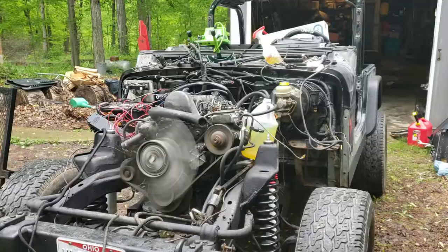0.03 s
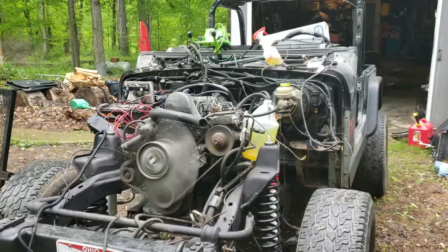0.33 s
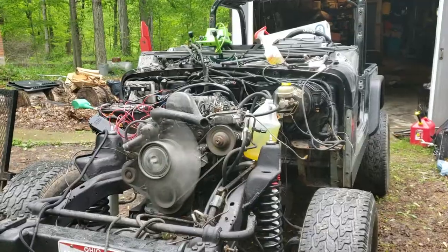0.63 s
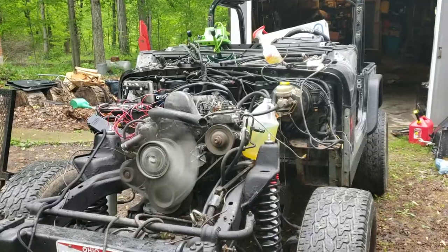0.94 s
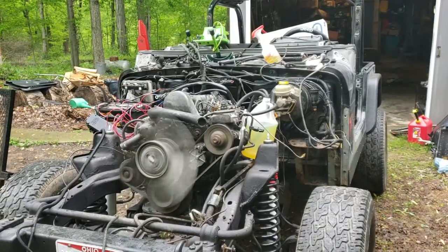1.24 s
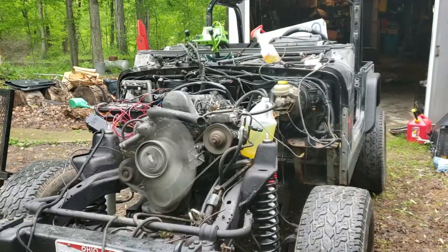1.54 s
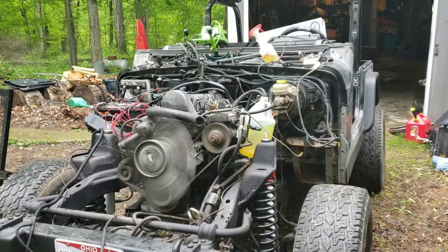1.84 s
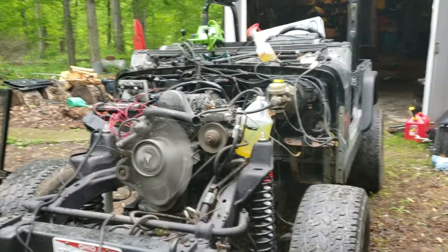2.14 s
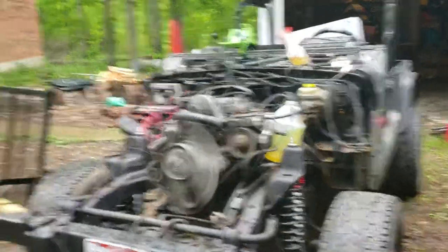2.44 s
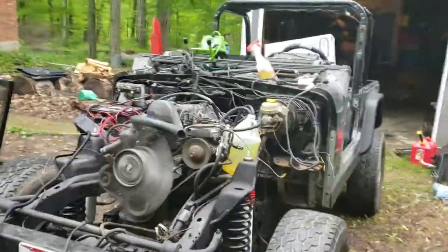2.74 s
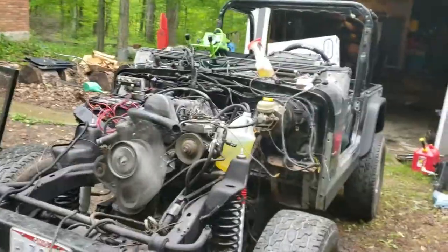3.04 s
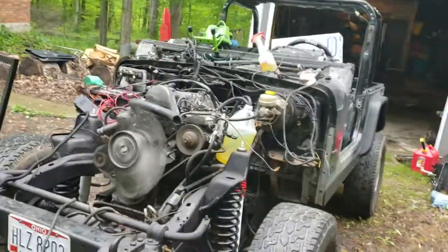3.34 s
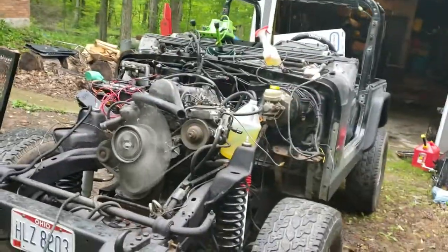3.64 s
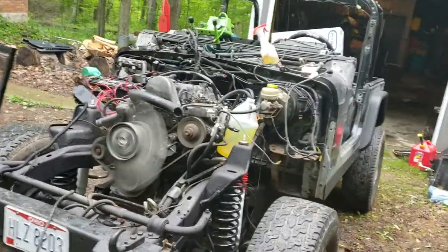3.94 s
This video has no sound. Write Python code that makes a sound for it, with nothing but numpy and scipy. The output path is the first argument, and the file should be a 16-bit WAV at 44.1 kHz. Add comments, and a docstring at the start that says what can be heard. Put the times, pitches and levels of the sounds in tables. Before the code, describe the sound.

An off-road car's diesel engine clatters at idle, with low pulses and metallic clacks.

```python
"""A five-cylinder diesel clatters at idle outdoors, in the bare front of an off-road car.
Over the whirr of fan and belts, each firing gives a spray of injector ticks, a knock that rings the
block's modes and a low boom of gas in the pipe; abrupt ignitions add a metallic clack.
Near 2.5 s a rasp swells and a finger clicks twice on the microphone, which moves back and aside,
so that the engine changes colour and is softer for about a second."""
import sys
import numpy as np
from scipy import signal
from scipy.fft import rfft, irfft
from scipy.io import wavfile
from scipy.ndimage import uniform_filter1d

SR = 44100
rng = np.random.default_rng(int(sys.argv[2]) if len(sys.argv) > 2 else 0)


def generate_wav(sig):
    """Save sig (samples, or channels by samples) to the path in sys.argv[1] as 16-bit PCM at SR."""
    pcm = np.round(np.clip(np.atleast_2d(sig).T, -1, 1) * 32767).astype(np.int16)
    wavfile.write(sys.argv[1], SR, pcm)


N = 176400
T = np.arange(N) / SR

# The cylinders in firing order, with relative levels:
# boom_delay_s, boom_start_hz, boom_rise_hz, boom_db, boom_swell_s, knock_db, tick_db
CYLINDERS = [(.0001, 167, 46.6, -12, 0.0063, 0.5, 3), (-.0016, 104.8, 103.1, -16, 0.0098, -2, 0),
             (.0003, 125.6, 51.8, -14.5, 0.0088, 0.5, 1), (.0003, 149.4, 73.2, -12.5, 0.007, 0.5, 1),
             (.0006, 128.5, 64.8, -12.5, 0.0067, 2.5, 2)]
# Gain of each source as the microphone moves: time_s, boom_db, knock_db, tick_db, whirr_db
PATH_GAINS = [(.1, -1.5, -2, -2.5, 0), (.5, 0.5, -2, 0.5, 1.5), (1, 0.5, 0, -0.5, 2),
              (1.9, 0.5, -0.5, -0.5, 2), (2.3, .5, -1, 4, 3), (2.5, -.5, 3, 2.5, 2),
              (2.8, -5.5, -7, -3.5, -2.5), (3.2, -6.5, -7.5, -5.5, -4), (3.55, -6.5, -8.5, -5.5, -4),
              (3.8, -4, -5, -1, -1.5), (4, -1, -1.5, 0, 0.5)]
# Spectral envelope of the ticks and the rasp: frequency_hz, gain_db
TICK_SPECTRUM = [(800, -13.5), (2500, -18), (4200, -1.5), (5300, -3), (6200, -2), (7000, 2), (8000, -6.5),
                 (9500, 2.5), (11500, 2.5), (13000, 0.5), (14200, -1.5), (16000, -3)]


def amp(db):
    """Decibels as an amplitude ratio."""
    return 10 ** (np.asarray(db) / 20)


def unit(x):
    """Normalisation to an rms of one."""
    return x / np.sqrt(np.mean(x ** 2) + 1e-20)


def over_time(table, column):
    """Linear interpolation of a time table at every sample."""
    rows = np.array(table)
    return np.interp(T, rows[:, 0], rows[:, column])


def over_frequency(table, hz, column=1):
    """Interpolation of a table on a logarithmic frequency axis."""
    rows = np.array(table)
    return np.interp(np.log(hz + 1), np.log(rows[:, 0]), rows[:, column])


def add(mix, start_s, sound):
    """Superposition of a sound on the mix."""
    part = mix[..., max(round(start_s * SR), 0):][..., :sound.shape[-1]]
    part += sound[..., :part.shape[-1]]


def colour(x, table, column=1, size=4096):
    """Minimum-phase filtering by a spectral envelope."""
    hz = abs(np.fft.fftfreq(size, 1 / SR))
    log_gain = np.log(amp(over_frequency(table, hz, column)))
    response = np.exp(np.conj(signal.hilbert(log_gain)))
    taps = np.fft.ifft(response).real[:size // 2]
    return signal.oaconvolve(np.atleast_2d(x), taps[None], axes=1)[:, :N]


def spread(pair):
    """Interaural coherence: two signals become a stereo pair of unit rms, alike in the bass."""
    # Likeness of the channels: frequency_hz, coherence (capped at one below)
    likeness = [(30, 1), (80, 0.75), (150, 1.14), (350, 0.83), (700, 0.79), (1400, 0.7), (2500, .15),
                (5000, 0), (16000, 0)]
    # Level difference between the channels: frequency_hz, left_minus_right_db
    balance = [(60, -1), (92, -2.5), (140, 2.5), (210, 3), (330, -2), (500, 2.5), (770, 1), (1170, 2.5),
               (1790, 0), (2740, -4), (4190, -2.0), (6410, 0.5), (9810, -4.5), (15000, 4)]
    hz = np.fft.rfftfreq(N, 1 / SR)
    coherence = np.clip(over_frequency(likeness, hz), -1, 1)
    tilt = amp(over_frequency(balance, hz) / 2)
    mid, side = rfft(pair) * np.sqrt([1 + coherence, 1 - coherence])
    return unit(irfft(np.array([(mid + side) * tilt, (mid - side) / tilt]), N))


def drift(rate_hz, count=24):
    """Random modulation: a sum of sines of random phase in the decade below rate_hz."""
    rates_hz = np.geomspace(rate_hz / 10, rate_hz, count)
    return unit(sum(np.sin(2 * np.pi * (hz * T + rng.random())) for hz in rates_hz))


def crank(first_firing_s=.104):
    """Four-stroke cycle: a cylinder fires every second turn. Gives the running count and the times."""
    # Crankshaft speed: time_s, speed_rpm
    speed = [(0.0, 708.5), (0.35, 707.0), (0.7, 707.3), (1.1, 706.7), (1.6, 705.5), (2.1, 706.8),
             (2.6, 707.0), (3.2, 706.6), (4.0, 705.1)]
    firing_hz = over_time(speed, column=1) / 60 * len(CYLINDERS) / 2
    fired = np.cumsum(firing_hz) / SR
    fired -= np.interp(first_firing_s, T, fired)
    return fired, np.interp(np.arange(int(fired[-1]) + 1), fired, T)


def rattles(times, levels_db, attack_s, hold_s, decay_s, repeat, grain_db, scatter_db, jitter_s):
    """Dense impacts merge into noise bursts; the share `repeat` of their power recurs each cycle."""
    out, t = np.zeros((2, N)), T[:SR // 16]
    envelope = np.minimum(t / attack_s, 1) * np.exp(-np.maximum(t - hold_s, 0) / decay_s)
    patterns = rng.standard_normal((len(CYLINDERS), 2, len(t)))
    for k, (start_s, db) in enumerate(zip(times, levels_db)):
        strength, late = rng.standard_normal(2)
        grain = amp(grain_db * unit(uniform_filter1d(rng.standard_normal(len(t)), size=40)))
        fresh = rng.standard_normal((2, len(t)))
        burst = np.sqrt(repeat) * patterns[k % len(patterns)] + np.sqrt(1 - repeat) * fresh
        add(out, start_s + jitter_s * late, amp(db + scatter_db * strength) * envelope * grain * burst)
    return out


def fan_and_belts(air_db=-29, flutter_db=0.94, grain_db=1.33, waver=.003):
    """Fan turbulence and chain rustle give broadband noise; periodic belts and blades give tones."""
    # Belt and blade tones: pitch_hz, level_db
    partials = [(593.5, -47), (892, -51), (382.5, -51.5)]
    # Spectral envelope of the whirr: frequency_hz, gain_db
    air_spectrum = [(20, -5), (35, -6), (70, 3), (130, 4.5), (200, 5), (300, 5.5), (400, -2), (620, 4),
                    (850, -4), (1600, -3), (2300, -9), (4200, -6.5), (5500, -12), (7000, -9.5),
                    (8000, -16.5), (9800, -11), (12500, -8.5), (16000, -26.5)]
    grain = unit(uniform_filter1d(rng.standard_normal(N), size=50))
    noise = rng.standard_normal((2, N)) * amp(flutter_db * drift(rate_hz=120) + grain_db * grain)
    whirr = amp(air_db) * spread(colour(noise, air_spectrum))
    for hz, db in partials:
        wavering_hz = hz * (1 + waver * drift(rate_hz=8))
        whirr += amp(db) * np.sqrt(2) * np.sin(2 * np.pi * np.cumsum(wavering_hz) / SR)
    return whirr * amp(over_time(PATH_GAINS, column=4))


def injector_ticks(firings, lead_s=0.0069, gain_db=-32):
    """Brief impacts have wide spectra: injectors and valve gear give a bright spray before each boom."""
    tick_db = np.resize(np.array(CYLINDERS)[:, 6], len(firings))
    spray = rattles(firings - lead_s, tick_db, attack_s=0.00085, hold_s=0.0049, decay_s=0.0098,
                    repeat=0.29, grain_db=1.5, scatter_db=2.16, jitter_s=.0003)
    return amp(gain_db + over_time(PATH_GAINS, column=3)) * spread(colour(spray, TICK_SPECTRUM))


def block_ring(times, levels_db, cylinders, others_db, scatter_db, attack_s):
    """Modal excitation: a blow rings the block's damped modes, favouring those of its own cylinder."""
    # Modes of the block: pitch_hz, t60_s, level_db, cylinder (the one that strikes it hardest)
    modes = [(608, 0.056, -12, 4), (667, 0.035, -4, 2), (710, 0.025, -8, 0), (925, 0.033, -9.5, 3),
             (1065, .05, -5, 0), (1435, 0.05, -4, 3), (1580, 0.029, -1, 2), (1677, 0.08, -8.5, 4),
             (1900, 0.03, 0, 4), (2830, .035, -3, 3), (3030, 0.058, -10, 4), (4280, 0.034, -3, 4)]
    out, t = np.zeros((2, N)), T[:SR // 14]
    hz, t60_s, mode_db, owner = np.array(modes).T[..., None]
    rings = amp(mode_db - 60 * t / t60_s) * (1 - np.exp(-t / attack_s)) * np.exp(2j * np.pi * hz * t)
    paths = np.exp(2j * np.pi * rng.random((2, len(hz))))  # a phase for each mode in each channel
    for start_s, db, cylinder in zip(times, levels_db, cylinders):
        uneven, phase = rng.standard_normal((2, len(hz)))
        gains = amp(db + scatter_db * uneven + others_db * (np.round(owner[:, 0]) != cylinder))
        add(out, start_s, (paths * gains * np.exp(.5j * phase) @ rings).real)
    return out


def combustion_knocks(firings, lead_s=.0058, rattle_db=-30, ring_db=-33):
    """Impulse response: combustion strikes the iron block, which rattles briefly and rings."""
    # Spectral envelope of the block's rattle: frequency_hz, gain_db
    block_spectrum = [(60, -38), (200, -13), (300, 0), (400, -8), (500, -2.5), (630, 2.5), (830, -5),
                      (980, -1), (1150, -12), (1430, 1), (1700, 2), (1950, -4), (2200, -7), (2500, -9.5),
                      (2900, -9.5), (3400, -13), (4200, -8), (5200, -14.5), (8000, -28), (16000, -34)]
    times = firings - lead_s
    cylinders = np.arange(len(times)) % len(CYLINDERS)
    knock_db = np.array(CYLINDERS)[cylinders, 5]
    blows = rattles(times, knock_db, attack_s=0.0011, hold_s=0.0061, decay_s=0.011,
                    repeat=0.61, grain_db=1.45, scatter_db=0.5, jitter_s=.0002)
    ring = block_ring(times, knock_db, cylinders, others_db=-7.5, scatter_db=3.0, attack_s=0.0029)
    knocks = amp(rattle_db) * spread(colour(blows, block_spectrum)) + amp(ring_db) * spread(ring)
    return knocks * amp(over_time(PATH_GAINS, column=2))


def pipe_booms(firings, glide_s=.015, sharpness=.85, scatter_db=0.5, low_cut_hz=45):
    """Damped oscillation: each cylinder's gas pulse swells in the pipe, rises in pitch and dies away."""
    out, t = np.zeros(N), T[:SR // 8]
    for k, (start_s, strength) in enumerate(zip(firings, rng.standard_normal(len(firings)))):
        delay_s, start_hz, rise_hz, db, swell_s = CYLINDERS[k % len(CYLINDERS)][:5]
        pitch_hz = start_hz + rise_hz * (1 - np.exp(-t / glide_s))
        envelope = (t / swell_s * np.exp(1 - t / swell_s)) ** sharpness
        boom = envelope * np.sin(2 * np.pi * np.cumsum(pitch_hz) / SR)
        add(out, start_s + delay_s, amp(db + scatter_db * strength) * boom)
    return signal.sosfilt(signal.butter(1, low_cut_hz, "high", fs=SR, output="sos"), out)


def firing_hum(fired):
    """Harmonic series: periodic firing gives a deep hum at whole multiples of its rate."""
    # Partials of the hum: harmonic_number, level_db
    harmonics = [(2, -36), (3, -34), (4, -41)]
    return sum(amp(db) * np.sqrt(2) * np.sin(2 * np.pi * round(k) * fired) for k, db in harmonics)


def ignition_clacks(firings, gain_db=-34, ring_db=-1.5):
    """Shock excitation: now and then the fuel lights abruptly and the metal rings harder."""
    # Abrupt ignitions: start_s, level_db
    ignitions = [(.201, -8), (.369, 0.5), (.405, -0.5), (.577, -6.5), (.745, -10), (.879, -5.5),
                 (.914, 1.5), (1.049, 2), (1.082, -6), (1.116, -6), (1.218, -5), (1.253, -7), (1.287, 1.5),
                 (1.422, 2.5), (1.457, -2), (1.595, -7), (1.627, 0.5), (1.934, -8), (2.273, -3),
                 (2.406, -12), (2.441, -3.5), (2.577, -7), (2.747, 0), (2.953, -4), (3.631, -1),
                 (3.936, -3)]
    # Spectral envelope of the clack: frequency_hz, gain_db
    spectrum = [(200, -30.5), (500, -10.5), (650, -3.5), (820, -6), (1000, -4), (1200, -6.5), (1450, 0),
                (1850, 0.5), (2300, -10), (2900, -4.5), (3600, -9), (4400, -10.5), (6000, -19),
                (16000, -32)]
    times, levels_db = np.transpose(ignitions)
    cylinders = np.searchsorted(firings, times) % len(CYLINDERS)
    blows = rattles(times, levels_db, attack_s=0.00055, hold_s=0.0035, decay_s=0.015,
                    repeat=.3, grain_db=1.5, scatter_db=0.0, jitter_s=.0001)
    ring = block_ring(times, levels_db, cylinders, others_db=-5, scatter_db=1.5, attack_s=.0007)
    clacks = spread(colour(blows, spectrum)) + amp(ring_db) * spread(colour(ring, spectrum))
    return clacks * amp(gain_db + over_time(PATH_GAINS, column=2))


def move_aside(front, passing_s=1.8, nearest_s=2.25, aside_s=2.7):
    """Directivity: the clatter changes colour as the microphone passes and turns aside."""
    # Spectrum relative to the front: frequency_hz, passing_db, aside_left_db, aside_right_db
    shading = [(200, 1, 4.5, 2), (600, -0.5, 0.5, -1), (1000, 1, 0, 2.5), (1450, 2, 0.5, 0),
               (2150, 1, 0, 0.5), (2950, 1.5, -2, 1.5), (4180, 2.5, -1, -1), (5540, 0, -2.5, -2),
               (7350, 2, -1.5, 3.5), (8300, -0.5, -4.5, -3.5), (10850, 1, -2, 4), (12500, -3.5, -4.5, -6.5),
               (15000, -3, 0.5, -3)]
    passing = colour(front, shading, column=1)
    aside = np.vstack([colour(front[0], shading, column=2), colour(front[1], shading, column=3)])
    near = np.clip((T - passing_s) / (nearest_s - passing_s), 0, 1)
    turned = np.clip((T - nearest_s) / (aside_s - nearest_s), 0, 1)
    return (1 - near) * front + (near - turned) * passing + turned * aside


def rasp():
    """Amplitude modulation: bright noise swells once under a Gaussian envelope."""
    # The swell: centre_s, width_s, level_db
    swell = (2.448, 0.016, -21.5)
    centre_s, width_s, db = swell
    envelope = np.exp(-((T - centre_s) / width_s) ** 2 / 2)
    return amp(db) * envelope * spread(colour(rng.standard_normal((2, N)), TICK_SPECTRUM))


def finger_clicks():
    """Free vibration: a finger taps the microphone's heavily damped case, heard on the left only."""
    # Taps on the case: start_s, level_db, pitch_hz, decay_s
    taps = [(2.5215, 0, 1900, 0.00047), (2.5348, 1, 2170, 0.00075)]
    out, t = np.zeros((2, N)), T[:SR // 100]
    for start_s, db, hz, decay_s in taps:
        add(out[0], start_s, amp(db) * np.exp(-t / decay_s) * np.sin(2 * np.pi * hz * t))
    return out


def scene():
    """Superposition of the engine's clatter, its bass and the finger clicks."""
    fired, firings = crank()
    front = combustion_knocks(firings) + ignition_clacks(firings) + injector_ticks(firings)
    front += fan_and_belts() + rasp()
    bass = (pipe_booms(firings) + firing_hum(fired)) * amp(over_time(PATH_GAINS, column=1))
    lean_left = amp([[.15], [-.15]])
    return move_aside(front) + bass * lean_left + finger_clicks()


def record(dry):
    """Gating and band limiting: the sound cuts in after a tenth of a second and is low-passed."""
    gate = np.interp(T, [.1045, .106], [0, 1])
    low_pass = signal.firwin(511, cutoff=15900, window=("kaiser", 9), fs=SR)
    return signal.oaconvolve(dry * gate, low_pass[None], "same")


dry = scene()
out = record(dry)
generate_wav(out)
```